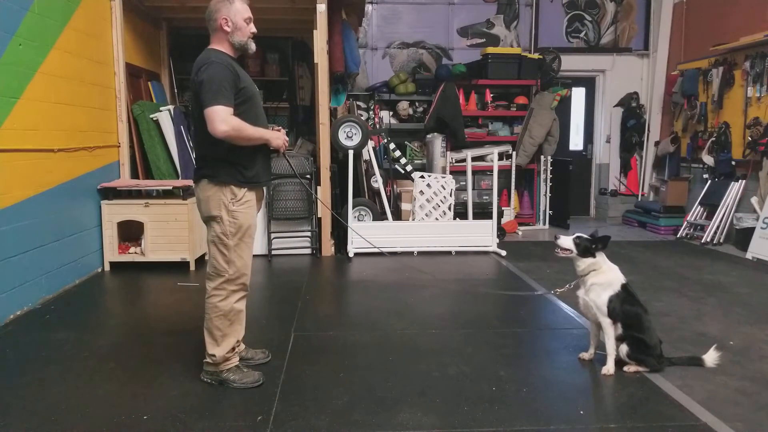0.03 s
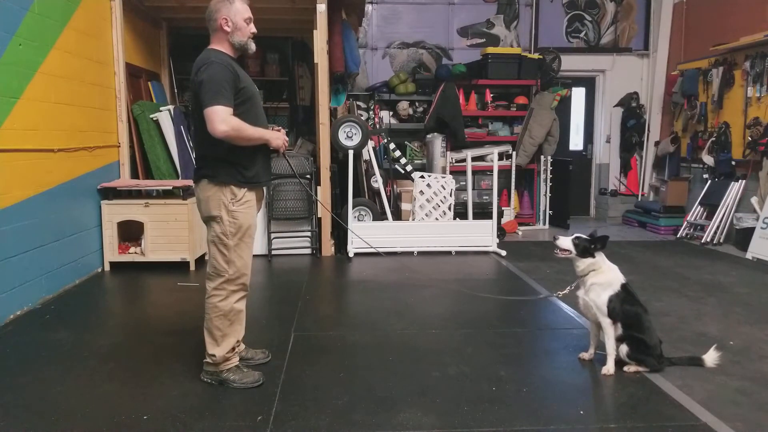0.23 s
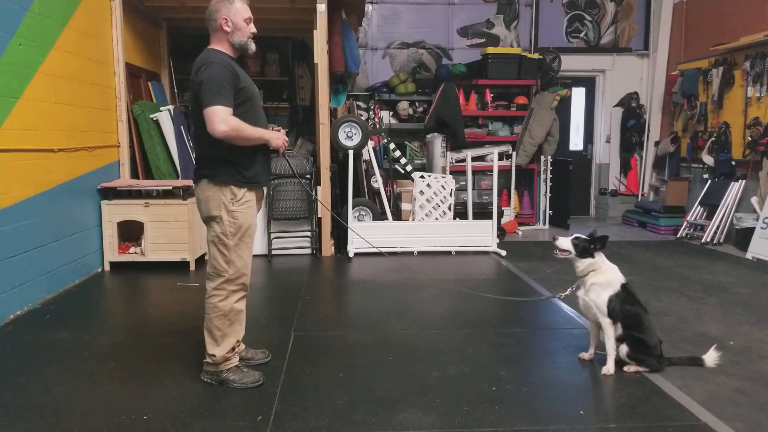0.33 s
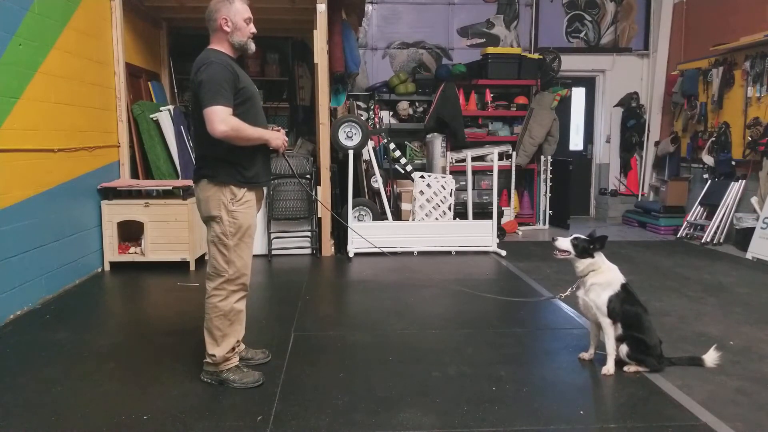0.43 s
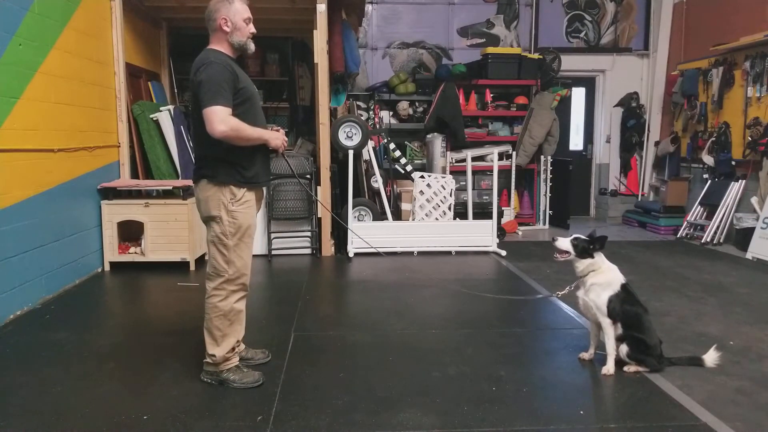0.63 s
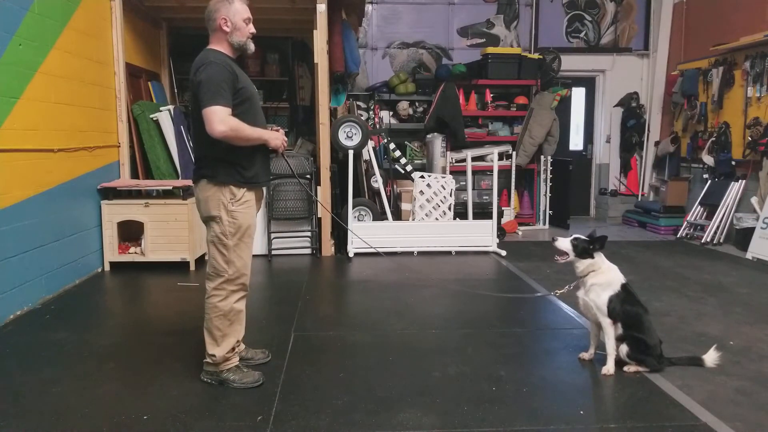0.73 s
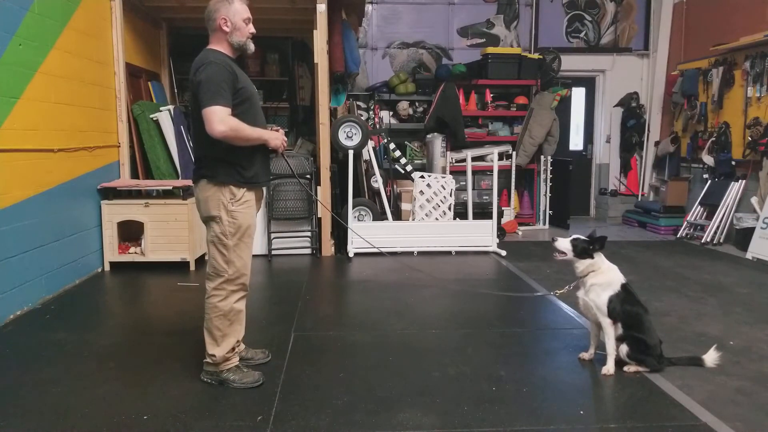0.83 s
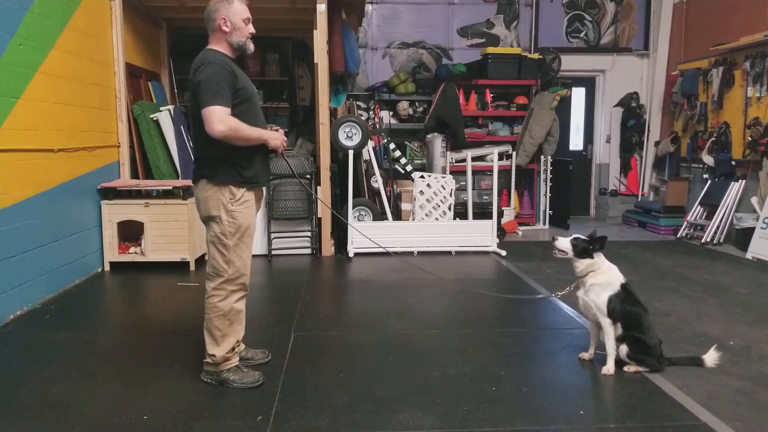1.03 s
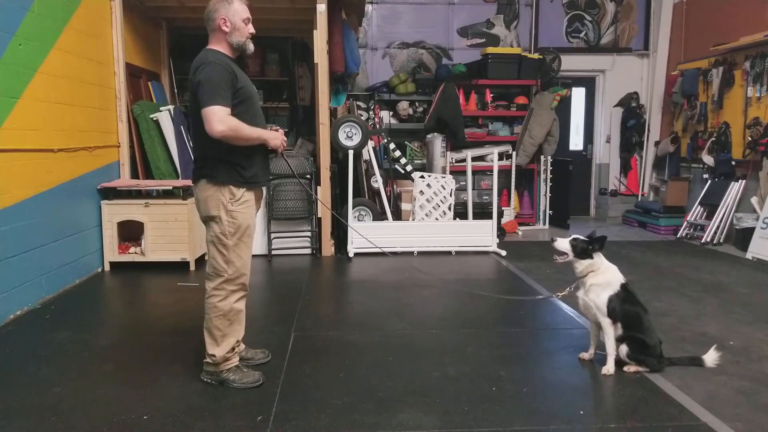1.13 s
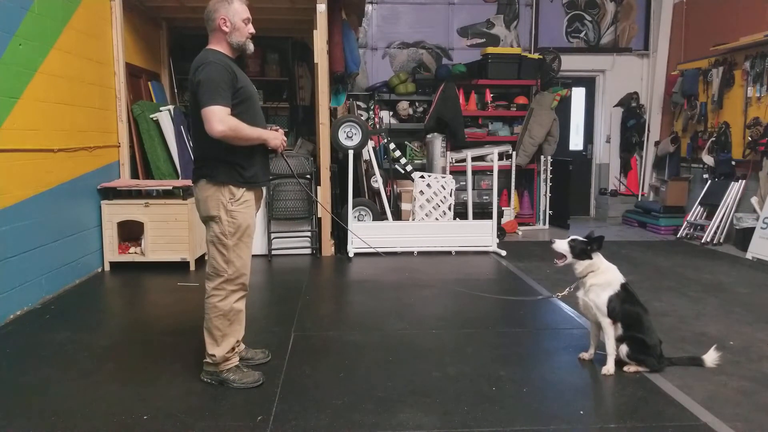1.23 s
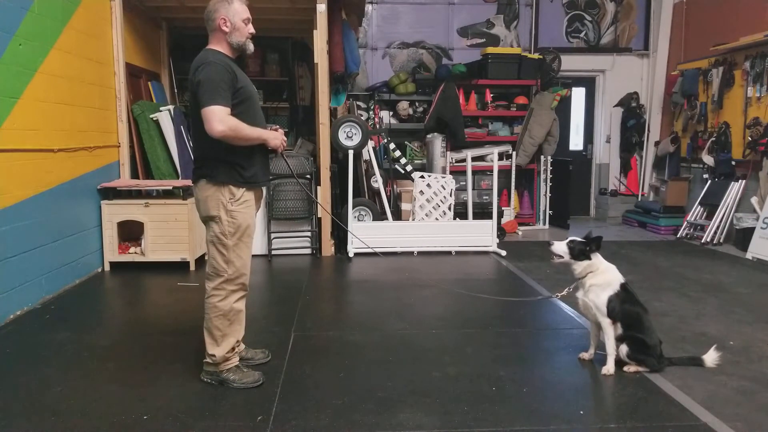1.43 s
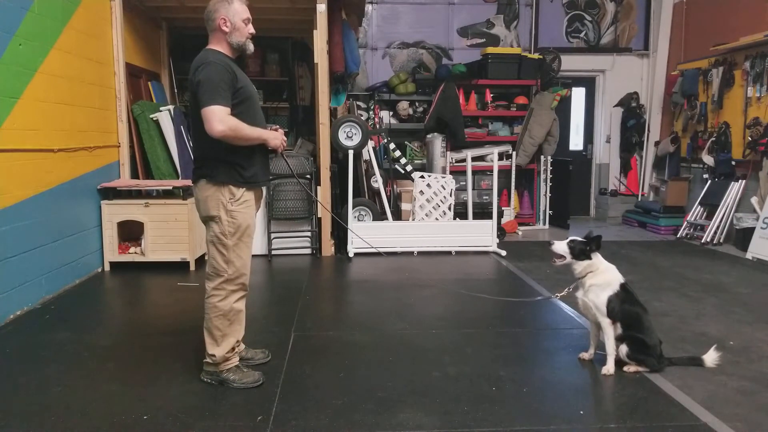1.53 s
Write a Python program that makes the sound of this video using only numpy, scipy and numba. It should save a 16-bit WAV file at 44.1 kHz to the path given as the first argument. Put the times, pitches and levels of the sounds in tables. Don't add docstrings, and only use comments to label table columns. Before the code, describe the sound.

A young dog whines thin and high, breaking into two short hoarse yips in an echoing hall.

```python
import sys
import numpy as np
from scipy import signal
from scipy.fft import rfft, irfft
from scipy.io import wavfile
from scipy.ndimage import uniform_filter1d
from numba import njit

SR = 44100
rng = np.random.default_rng(int(sys.argv[2]) if len(sys.argv) > 2 else 0)


def transcribe(u):
    v = np.clip(np.atleast_2d(u).T, -1, 1)
    q = np.round(v * 32767).astype(np.int16)
    wavfile.write(sys.argv[1], SR, q)


def invert_db(x):
    u = np.asarray(x, float) / 20
    return 10 ** u


N = 70560

# time [s], level [dB].
FADING_EFFORT = [(0, 5.5), (.035, 0.5), (.1, -1), (.18, -10), (.26, -38)]
# first [Hz], last [Hz], width [Hz], level [dB].
FADING_RINGS = [(6310, 6290, 70, -46.5), (5570, 4900, 320, -55.5), (5980, 8000, 250, -56),
                (6950, 8000, 1400, -57.5), (8500, 10300, 1000, -65), (4680, 4600, 660, -66.5)]
# time [s], level [dB].
DRAW_IN_EFFORT = [(.05, -31), (.1, -7.5), (.15, 1), (.22, 5), (.27, 3.5), (.34, -21), (.45, -41)]
# first [Hz], last [Hz], width [Hz], level [dB].
DRAW_IN_RINGS = [(5744, 5520, 120, -51), (6804, 6830, 89, -53), (7230, 6950, 130, -57),
                 (10300, 10450, 73, -58), (11660, 11870, 103, -55), (6420, 6100, 1560, -48.5),
                 (10650, 10300, 2500, -56), (15560, 16000, 500, -74)]
# time [s], level [dB], mouth opening [0-1].
WHINE_EFFORT = [(.19, -42, 0), (.24, -15, 0.02), (.27, -4.5, 0), (.35, -5, 0), (.45, 0.5, 0.01),
                (.52, 1, 0), (.56, 1, .6), (.6, -4, 1), (.645, -40, 0.8)]
# first [Hz], last [Hz], width [Hz], level [dB].
WHINE_RINGS = [(5029, 4720, 65, -31.5), (6295, 5800, 78, -41.5), (11385, 11000, 100, -52.5),
               (12850, 12250, 170, -48.5), (10113, 9960, 120, -48.5)]
# time [s], level [dB].
WHISTLE_EFFORT = [(.2, -41), (.25, -8), (.28, -4), (.42, 1), (.52, 1), (.6, -5.5), (.72, -17), (.88, -33.5),
                  (1.05, -42)]
# first [Hz], last [Hz], width [Hz], level [dB].
WHISTLE_RINGS = [(5053, 5070, 41.3, -30.5)]
# time [s], level [dB].
WHINE_LOW_EFFORT = [(.14, -44), (.2, -8), (.25, -2.5), (.4, 1.5), (.47, -3.5), (.58, 1.5), (.63, 0),
                    (.65, -35)]
# first [Hz], last [Hz], width [Hz], level [dB].
WHINE_LOW_RINGS = [(1473, 1000, 155, -55), (3643, 3900, 106, -55), (2700, 2350, 430, -67),
                   (8700, 8980, 128, -53.5)]
# time [s], level [dB].
HISS_EFFORT = [(.2, -34), (.27, -0.5), (.4, 0), (.56, -1.5), (.63, -1), (.7, -7), (.78, -24), (.86, -32)]
# first [Hz], last [Hz], width [Hz], level [dB].
HISS_RINGS = [(6160, 5800, 1330, -41.5), (7170, 7830, 590, -47.5), (11020, 12250, 4200, -47.5),
              (14600, 14200, 3100, -54)]
# time [s], level [dB].
YIP_1_EFFORT = [(.54, -31), (.578, -8.5), (.59, 1.5), (.628, -2), (.638, -30), (.66, -52)]
# first [Hz], last [Hz], width [Hz], level [dB].
YIP_1_RINGS = [(4852, 4800, 270, -31.5), (3936, 3880, 90, -44.5), (3460, 3330, 910, -45.5),
               (2380, 2330, 350, -55.5), (1050, 910, 263, -49.5), (640, 690, 197, -47.5),
               (5760, 5700, 570, -42), (345, 348, 60, -61.5)]
# time [s], level [dB].
GASP_EFFORT = [(.87, -18), (.9, 0), (.93, -1.5), (.97, 4), (1.01, 1), (1.05, -31), (1.09, -26)]
# first [Hz], last [Hz], width [Hz], level [dB].
GASP_RINGS = [(4880, 9500, 720, -59.5), (6085, 6600, 22, -66.5), (7370, 7400, 350, -63),
              (14710, 14710, 44, -77), (6300, 5800, 1600, -59.5)]
# time [s], level [dB].
WHIMPER_EFFORT = [(.97, -22), (1.05, -9.5), (1.07, 0), (1.12, 0), (1.17, 4), (1.22, -2.5), (1.34, -8),
                  (1.39, -57)]
# first [Hz], last [Hz], width [Hz], level [dB].
WHIMPER_RINGS = [(7133, 7035, 61, -54), (7440, 7470, 108, -53), (11500, 11285, 70, -63),
                 (10760, 10720, 2000, -53.5), (14000, 13900, 1600, -69), (6200, 5600, 1540, -57.5),
                 (15520, 15520, 500, -70)]
# time [s], level [dB].
NOSE_EFFORT = [(1.06, -25), (1.1, -6.5), (1.15, 4.5), (1.19, -12), (1.25, -14.5), (1.28, -33)]
# first [Hz], last [Hz], width [Hz], level [dB].
NOSE_RINGS = [(1284, 1275, 39.6, -56), (10080, 10050, 43, -47.5)]
# time [s], level [dB].
YIP_2_EFFORT = [(1.11, -34), (1.13, -12), (1.21, -5.5), (1.245, -2), (1.275, 2.5), (1.3, -7.5),
                (1.36, -8.5), (1.4, -30)]
# first [Hz], last [Hz], width [Hz], level [dB].
YIP_2_RINGS = [(4355, 4240, 98, -36.5), (5420, 5320, 240, -50), (3030, 3850, 920, -57.5)]
# time [s], level [dB], mouth opening [0-1].
THROAT_EFFORT = [(1.2, -29.5, 0.015), (1.225, -15, .1), (1.245, -3, .6), (1.27, -1, 1), (1.29, -4, 0.92),
                 (1.33, -11, .8), (1.38, -30.5, 0.91)]
# first [Hz], last [Hz], width [Hz], level [dB].
THROAT_RINGS = [(1077, 785, 137, -36), (1200, 940, 143, -57), (679.4, 650, 112, -51),
                (3334, 3330, 110, -53), (4100, 4040, 99, -42), (3600, 3680, 580, -53.5),
                (11700, 11900, 110, -50), (5500, 5400, 980, -54)]
# frequency [Hz], time to fall 60 dB [s].
HALL_T60_S = [(300, 0.44), (1000, 0.33), (3000, 0.34), (5000, 0.75), (9000, 0.49), (15000, 0.35)]
# time [s], pitch [Hz], level [dB].
HUM = [(0, 343.4, -62.5), (.1, 338.5, -63), (.6, 341, -60.5), (.85, 343.8, -61.5), (1.06, 343.8, -53.5),
       (1.12, 343, -62), (1.17, 328.4, -72), (1.24, 322, -62.5), (1.3, 305, -93)]
# frequency [Hz], density [dB per Hz].
RUMBLE_SPECTRUM = [(20, -52), (45, -12), (70, 0.5), (130, -0.5), (500, -20.5), (700, -29.5), (2500, -39),
                   (15600, -37)]
# time [s], level [dB].
RUMBLE_DB = [(0, -56), (.5, -55), (.9, -57.5), (1.1, -54.5), (1.35, -58.5), (1.6, -57.5)]

DOG_DB, FLUTTER_DB, WHISTLES_UNDER_HZ = -4, 1.5, 140
EAR_LAG_S = 0.000198
HALL_DB, HALL_GAP_S = -5.5, 0.0054
NEAR_WALLS_DB, NEAR_WALLS_T60_S = 2, 0.08
FAN_HZ, FAN_WIDTH_HZ, FAN_DB = 88, 27, -0.5
WIDE_ABOVE_HZ = 600


@njit
def svf(x, hz, width_hz):
    y, band, low = np.empty(len(x)), 0., 0.
    for i in range(len(x)):
        g = np.tan(np.pi * hz[i] / SR)
        k = width_hz / hz[i]
        v = (band + g * (x[i] - low)) / (1 + g * (g + k))
        band = 2 * v - band
        low = low + 2 * g * v
        y[i] = k * v
    return y


def unit(x):
    return x / np.sqrt(np.mean(x ** 2))


def curve(rows, axis=1):
    rows = np.array(rows, float)
    return np.interp(np.arange(N) / SR, rows[:, 0], rows[:, axis])


def walk(rate_hz):
    hold = int(SR / rate_hz)
    steps = np.repeat(rng.standard_normal(N // hold + 1), hold)
    smooth = uniform_filter1d(uniform_filter1d(steps, hold), hold)
    return unit(smooth[:N])


def ring(air, waver, hz, width_hz, clear):
    for _ in range(3):
        air = svf(air, hz, 1.5 * width_hz)
    phase = 2 * np.pi * np.cumsum(hz + width_hz / 3 * waver) / SR
    whistle = np.sqrt(2) * np.sin(phase)
    clear = np.clip(clear, 0, 1) * (width_hz < WHISTLES_UNDER_HZ)
    return np.sqrt(1 - clear) * unit(air) + np.sqrt(clear) * whistle


def pose(effort, rings, clear, pan_db):
    start_s, end_s = max(effort[0][0], 0), effort[-1][0]
    pan = np.array([[pan_db], [-pan_db]]) / 2
    flow = invert_db(curve(effort) + FLUTTER_DB * walk(45.35) + DOG_DB + pan)
    if len(effort[0]) > 2:
        opening = curve(effort, axis=2)
    else:
        opening = (np.arange(N) / SR - start_s) / (end_s - start_s)
    span = slice(int(start_s * SR), int(end_s * SR))
    opening = np.clip(opening[span], 0, 1)
    air, waver = rng.standard_normal(N)[span], walk(80)[span]
    out = np.zeros(N)
    for first_hz, last_hz, width_hz, db in rings:
        hz = first_hz + (last_hz - first_hz) * opening
        out[span] += ring(air, waver, hz, width_hz, clear) * invert_db(db)
    return out * flow


def whine():
    return (pose(WHINE_EFFORT, WHINE_RINGS, clear=0.29, pan_db=-1.5)
            + pose(WHISTLE_EFFORT, WHISTLE_RINGS, clear=0.56, pan_db=0)
            + pose(WHINE_LOW_EFFORT, WHINE_LOW_RINGS, clear=0.086, pan_db=1)
            + pose(HISS_EFFORT, HISS_RINGS, clear=0, pan_db=1.5)
            + pose(YIP_1_EFFORT, YIP_1_RINGS, clear=0.25, pan_db=-2.5))


def whimper():
    return (pose(WHIMPER_EFFORT, WHIMPER_RINGS, clear=0.32, pan_db=2.5)
            + pose(NOSE_EFFORT, NOSE_RINGS, clear=0.58, pan_db=-2.5)
            + pose(YIP_2_EFFORT, YIP_2_RINGS, clear=0.24, pan_db=-2)
            + pose(THROAT_EFFORT, THROAT_RINGS, clear=0.24, pan_db=-3.5))


def inbreaths():
    return (pose(DRAW_IN_EFFORT, DRAW_IN_RINGS, clear=0.14, pan_db=0.5)
            + pose(GASP_EFFORT, GASP_RINGS, clear=0.3, pan_db=-3))


def dog():
    fading = pose(FADING_EFFORT, FADING_RINGS, clear=0.2, pan_db=1)
    return fading + whine() + whimper() + inbreaths()


def hall(x):
    t = np.arange(N // 2) / SR
    table = np.array(HALL_T60_S)
    near_noise, far_noise = rng.standard_normal((2, 2, N // 2))
    near_decay = invert_db(NEAR_WALLS_DB - 60 * t / NEAR_WALLS_T60_S)
    tail = near_decay * near_noise / np.sqrt(NEAR_WALLS_T60_S * SR / 14)
    for hz in 200 * 2 ** np.arange(0, 6.6, .5):
        t60_s = np.interp(np.log(hz), np.log(table[:, 0]), table[:, 1])
        band = np.array([svf(v, np.full(N // 2, hz), hz / 3) for v in far_noise])
        decay = invert_db(HALL_DB - 60 * t / t60_s) / np.sqrt(t60_s * SR / 14)
        tail = tail + band * decay * (t > HALL_GAP_S)
    return signal.fftconvolve(x, tail, axes=1)[:, :N]


def hum():
    phase = 2 * np.pi * np.cumsum(curve(HUM) + 2.7 * walk(19.8)) / SR
    level_db = curve(HUM, axis=2) + 1.37 * walk(11.75)
    return np.sqrt(2) * np.sin(phase) * invert_db(level_db)


def rumble():
    hz = np.maximum(np.fft.rfftfreq(N, 1 / SR), 1)
    table = np.array(RUMBLE_SPECTRUM)
    gain = invert_db(np.interp(np.log(hz), np.log(table[:, 0]), table[:, 1]))
    mid = rfft(rng.standard_normal(N)) * gain
    side = rfft(rng.standard_normal(N)) * gain * np.clip(hz / WIDE_ABOVE_HZ, 0, 1)
    air = unit(irfft(np.array([mid + side, mid - side]), N))
    fan = ring(rng.standard_normal(N), 0, np.full(N, float(FAN_HZ)), FAN_WIDTH_HZ, clear=0)
    return (air + invert_db(FAN_DB) * fan) * invert_db(curve(RUMBLE_DB))


def scene():
    voice = dog()
    late = np.interp(np.arange(N) - EAR_LAG_S * SR, np.arange(N), voice[1])
    near = np.array([voice[0], late])
    return near + hall(voice) + hum() + rumble()


def top_cut(x):
    return signal.sosfilt(signal.butter(12, 15770, fs=SR, output="sos"), x)


def record(dry):
    return top_cut(dry)


dry = scene()
out = record(dry)
transcribe(out)
```